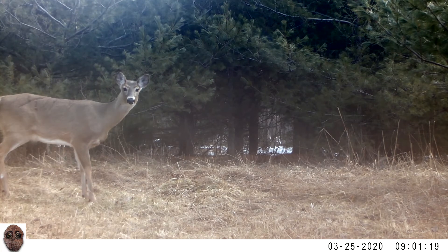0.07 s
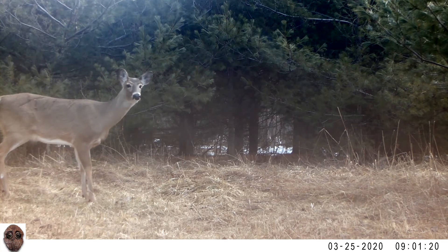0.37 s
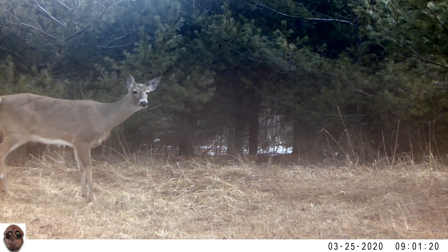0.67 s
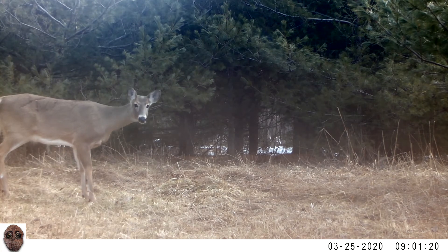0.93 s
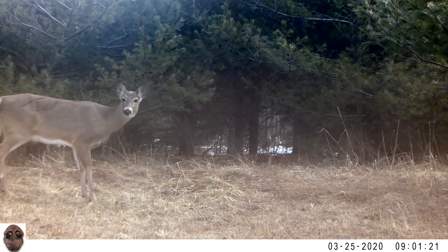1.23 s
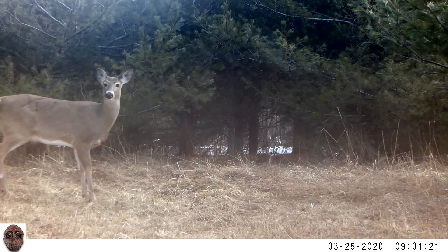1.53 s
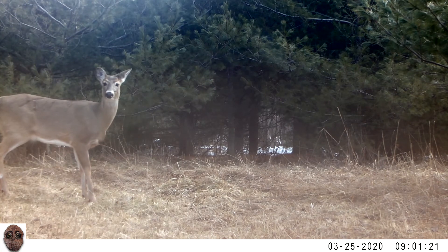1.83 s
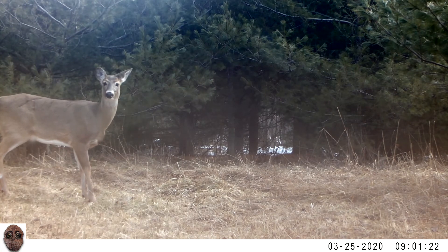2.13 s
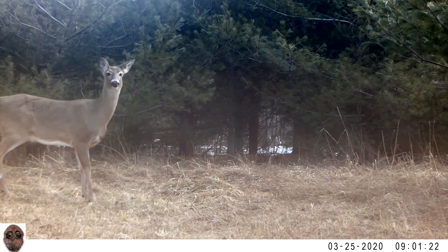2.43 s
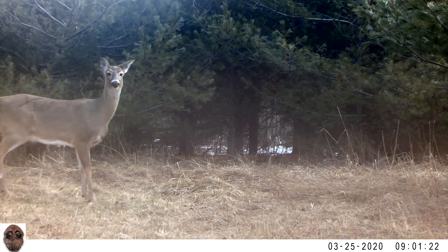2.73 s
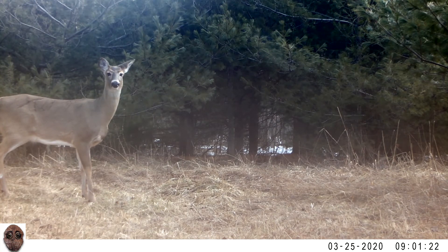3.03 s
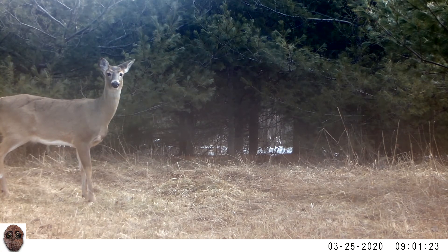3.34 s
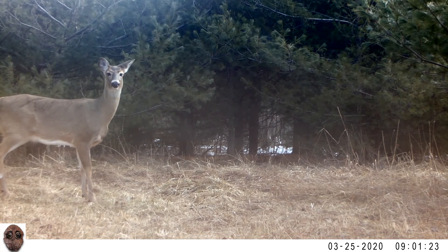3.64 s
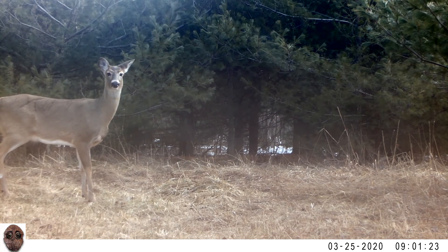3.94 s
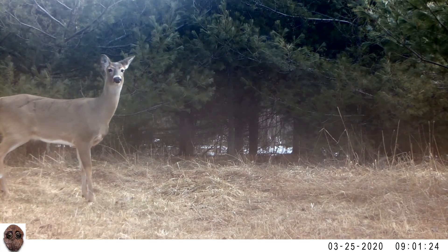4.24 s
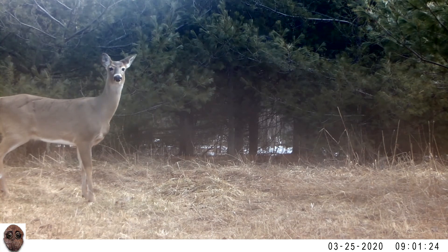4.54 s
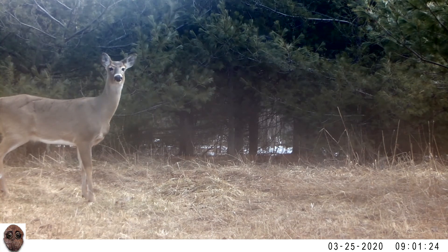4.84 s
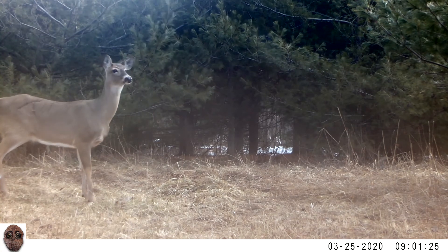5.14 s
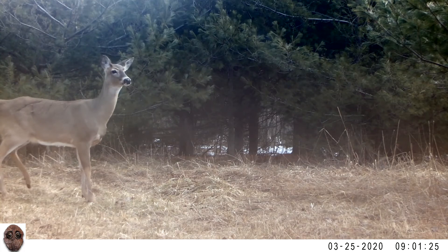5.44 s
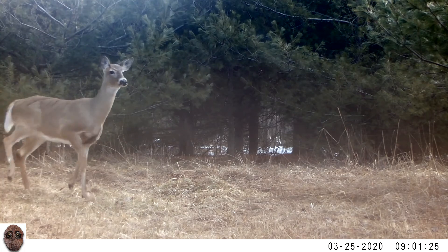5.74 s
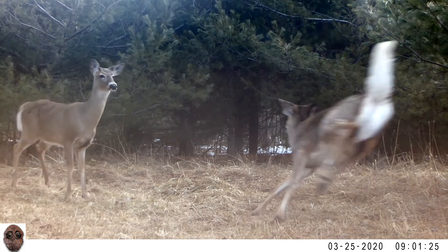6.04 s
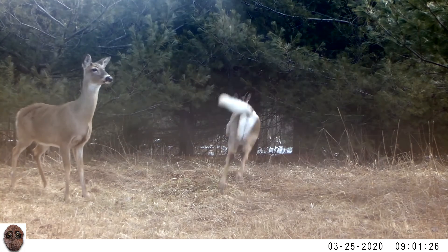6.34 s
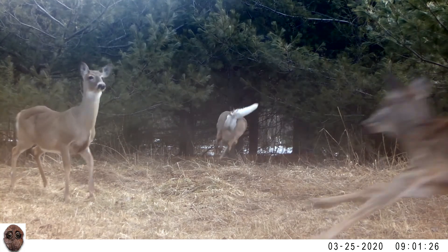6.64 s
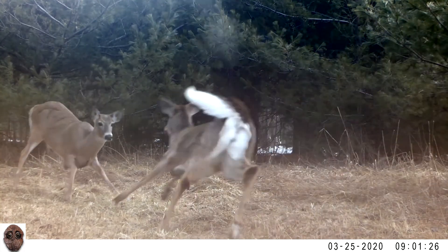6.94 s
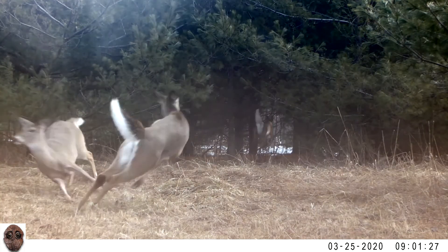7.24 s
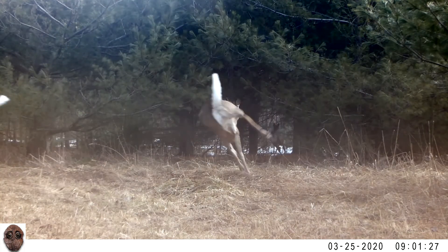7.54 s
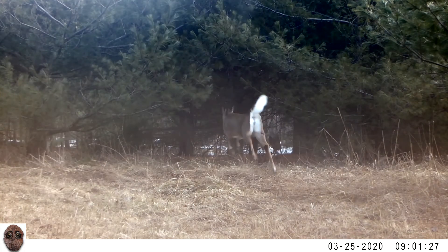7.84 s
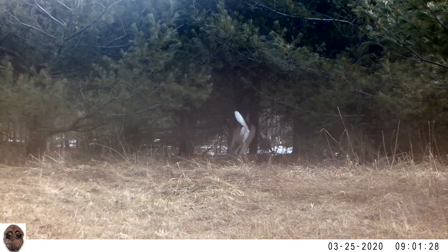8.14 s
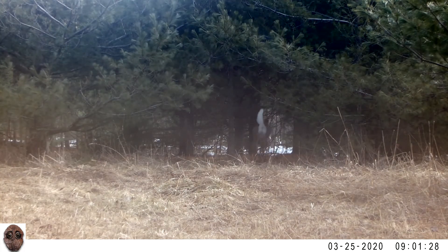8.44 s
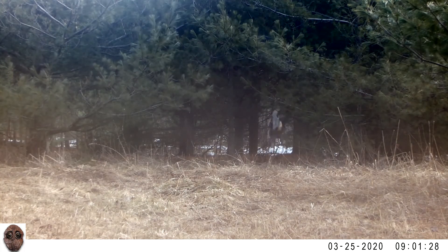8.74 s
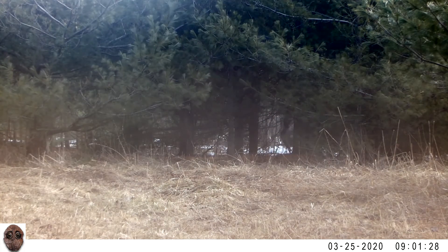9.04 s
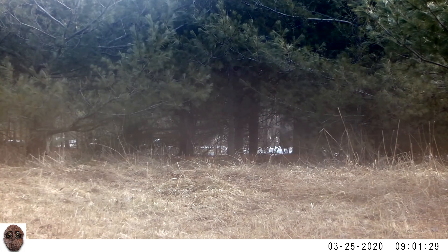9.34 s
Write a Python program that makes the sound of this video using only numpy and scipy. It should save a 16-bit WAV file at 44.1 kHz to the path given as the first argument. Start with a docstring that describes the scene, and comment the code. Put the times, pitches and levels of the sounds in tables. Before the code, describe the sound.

Distant geese call throughout over a soft hiss of air in pine trees, their voices leaving a faint echo. One gives short, high yelps several times a second, loudest in the first second. Another answers with lower, longer honks at about 0.9 seconds, then roughly once a second from 3.4 to 8.5. A third gives one broken squawk at about 2 seconds. Wind buffets the microphone in low puffs around 0.5 to 1 second and again from 3 to 4. From about 5.6 to 7.4 seconds, deer run past nearby, with brief rustles of dry grass and sharp little snaps of stalks. The loudest moment is a thump of air on the microphone just before 7 seconds, followed by a smaller one at 7.4. Afterward the yelps grow sparse and faint, with two slight rustles near 8.1 and 9.2 seconds.

```python
"""A goose yelps high and often, far off in a softly hissing pine wood. A second answers lower and longer,
and a third gives one broken squawk. Each call is a buzz shaped by the bird's throat, and the tree trunks
scatter it into a faint echo. Puffs of air buffet the microphone of a trail camera, and in the second
half deer bound past it, crushing dry grass and snapping stalks."""
import sys
import numpy as np
from scipy import signal
from scipy.fft import rfft, irfft, next_fast_len
from scipy.io import wavfile
from scipy.ndimage import map_coordinates

SR = 44100
rng = np.random.default_rng(int(sys.argv[2]) if len(sys.argv) > 2 else 0)


def wav_record(signal):
    """Record a signal, one row per channel, as 16-bit PCM in the file named by sys.argv[1]."""
    frames = np.transpose(np.atleast_2d(signal))
    bounded = np.clip(frames, -1, 1)
    # unit amplitude maps onto the largest positive 16-bit level
    quanta = np.round(bounded * 32767).astype(np.int16)
    wavfile.write(sys.argv[1], SR, quanta)


N = 414099

# The tone of dry grass breaking: frequency_hz, level_db
GRASS_TONE = [(100, -8), (450, 4.5), (1500, 4), (2200, 5.5), (4000, -5.5), (5500, -18.5), (7500, -38.5),
              (15000, -42)]
# How a goose's throat shapes a croak: frequency_hz, level_db
CROAK_THROAT = [(300, -30.5), (580, -3), (760, -6.5), (1000, 0.5), (1350, 0.5), (1750, -21.5),
                (2150, -11.5), (3000, -31.5)]


def amp(db):
    """Turn decibels into a number to multiply by."""
    return 10 ** (np.asarray(db) / 20)


def unit(x):
    """Scale a sound to an average (rms) level of 1."""
    return x / np.sqrt(np.mean(x ** 2) + 1e-20)


def along(points, hz):
    """Read between (frequency_hz, value) rows, on a scale of octaves."""
    frequencies, values = np.transpose(points)
    return np.interp(np.log(hz + 1), np.log(frequencies + 1), values)


def curve(rows):
    """Join (time_s, value) rows into one value per sample."""
    return np.interp(np.arange(N) / SR, *np.transpose(rows))


def wobble(rate, size=N):
    """A smooth curve through `rate` random values a second."""
    points = rng.standard_normal(int(size * rate / SR) + 4)
    return map_coordinates(points, [np.arange(size) * rate / SR])


def filtered(x, response):
    """Multiply each frequency in a sound by response(hz)."""
    size = next_fast_len(len(x) + 8192)
    return irfft(rfft(x, size) * response(np.fft.rfftfreq(size, 1 / SR)), size)[:len(x)]


def coloured(x, tone):
    """Shape a sound with (frequency_hz, level_db) rows."""
    return filtered(x, lambda hz: amp(along(tone, hz)))


def noise(tone, lumps=1, size=N):
    """Noise with the given tone and an average level of 1; `lumps` makes it uneven."""
    return unit(coloured(lumps * rng.standard_normal(size), tone))


def add(track, start_s, sound):
    """Mix a sound into the track."""
    start = max(round(start_s * SR), 0)
    part = track[start:start + len(sound)]
    part += sound[:len(part)]


def swell(progress, rise, fall):
    """Fade in and out as progress goes from 0 to 1; rise and fall are shares of that span."""
    fade_in = np.sin(np.pi / 2 * np.clip(progress / rise, 0, 1))
    fade_out = np.sin(np.pi / 2 * np.clip((1 - progress) / fall, 0, 1)) ** 2
    return fade_in * fade_out


def pines():
    """Air hisses softly in the pines."""
    # How loud the high part of the hiss is: time_s, level_db
    treble = [(0.0, -58), (1.99, -60), (2.12, -58.5), (5.15, -59), (5.57, -56.5), (9.39, -60)]
    # The tone of air in the trees: frequency_hz, level_db
    tone = [(20, -23.5), (80, -15), (400, -4.5), (700, 0), (1000, 0), (1500, 2.5), (1900, -2), (3000, -7),
            (4000, -14.5), (5000, -23), (6300, -32.5), (8000, -45.5), (16000, -75)]
    body_db = 5.5  # the whole hiss is this much louder than its high part
    return amp(curve(treble) + body_db + 0.74 * wobble(7.8)) * noise(tone)


def lingering_ring():
    """The blurred ring of earlier honks dies away among the trees."""
    # The tone of the ring: frequency_hz, level_db
    tone = [(500, -120), (900, -30.5), (1250, -10), (1400, 5), (1560, 3.5), (1680, -9), (1900, -32.5),
            (3000, -120)]
    start_db, fade_db_per_s = -51.5, 6.5
    return amp(start_db - fade_db_per_s * np.arange(N) / SR) * noise(tone)


def air_flow_db():
    """The level of the moving air: each gust rises, holds and dies away over a light, unsteady breeze."""
    # Gusts on the microphone: start_s, hold_s, level_db
    gusts = [(.12, 0.054, -50.5), (.37, 0.066, -62), (.525, 0.51, -42.5), (1.17, 0.098, -49),
             (1.42, 0.15, -60), (2.13, 0.11, -62), (2.47, .02, -48.5), (2.582, 0.027, -46),
             (2.791, 0.07, -45.5), (3.155, 0.81, -45), (4.02, .13, -54), (4.605, 1.04, -58.5),
             (4.857, .19, -51.5), (5.256, 0.23, -52), (6.1, 0.43, -61), (6.684, 0.937, -47),
             (6.84, 0.17, -36), (6.935, 0.028, -24.5), (7.41, 0.01, -28), (8.013, 0.18, -54),
             (8.842, 0.37, -58.5)]
    breeze_db, rise_s, fall_s = -68, 0.016, 0.024
    t = np.arange(N) / SR
    power = amp(breeze_db) ** 2
    for start_s, hold_s, level_db in gusts:
        fade = np.maximum(start_s - t, 0) / rise_s + np.maximum(t - start_s - hold_s, 0) / fall_s
        power = power + (amp(level_db) * np.exp(-np.minimum(fade, 20))) ** 2
    return 10 * np.log10(power) + 1.5 * wobble(16)


def eddy(pitch_hz):
    """A swirl of air: one swing of pressure with a random lean, plus a smaller, faster curl."""
    def swing(cycles):
        lean = np.exp(1j * rng.uniform(0, 2 * np.pi))
        return np.real(lean / (1 - 1j * cycles) ** 7)  # a pulse about one cycle long

    cycles = np.arange(-SR // 50, SR // 50) / SR * pitch_hz
    return swing(0.95 * cycles) + amp(-10.5) * swing(1.91 * cycles - 0.6)


def wind():
    """Air buffets the microphone in lumps over a deep rumble, with single sharp swirls on top."""
    # The tone of the buffeting: frequency_hz, level_db
    buffet_tone = [(10, -33.5), (40, -18), (80, -1.5), (135, 2), (230, -5), (350, -12), (550, -27.5),
                   (900, -43), (2000, -94.5)]
    # The tone of the rumble: frequency_hz, level_db
    rumble_tone = [(10, -9), (35, 2), (70, 4), (140, -14), (400, -63.5)]
    # The tone of tiny, fluttering swirls: frequency_hz, level_db
    flutter_tone = [(20, -40), (100, -24), (300, -2.5), (520, 0.5), (900, -14.5), (1300, -22.5),
                    (2200, -58), (5000, -120)]
    # The strongest swirls: middle_s, level_db, pitch_hz
    eddies = [(0.5332, -31, 217), (0.614, -23, 272), (0.6467, -30.5, 237), (.771, -27, 325),
              (1.0135, -28.5, 228), (3.1588, -19.5, 235), (3.1847, -23, 408), (3.5254, -26.5, 210),
              (3.563, -28, 423), (3.651, -27.5, 256), (3.7091, -27, 260), (3.7234, -23, 298),
              (3.819, -25, 227), (6.715, -24, 238), (6.86, -20.5, 272), (6.9149, -11, 580),
              (6.933, -3, 406), (6.94, -12.5, 395), (6.9526, -14, 377), (7.0013, -10.5, 468),
              (7.378, -20, 180), (7.4049, -20.5, 340), (7.425, -15.5, 355)]
    flow_db = air_flow_db()
    lumps = amp(4.5 * wobble(70))
    out = amp(flow_db) * noise(buffet_tone, lumps)
    # The rumble grows more slowly and the flutter faster, so strong gusts are brighter.
    out += amp(0.58 * flow_db - 28) * noise(rumble_tone)
    out += amp(1.318 * flow_db + 1) * noise(flutter_tone, lumps)
    for middle_s, level_db, pitch_hz in eddies:
        swirl = eddy(pitch_hz)
        add(out, middle_s - len(swirl) / 2 / SR, amp(level_db) * swirl)
    return out


def deer_steps():
    """Each step of a deer crushes a cluster of dry grass blades."""
    # Legs brushing through grass: start_s, brush_s, level_db
    steps = [(5.648, 0.038, -47), (5.712, 0.064, -48.5), (5.818, 0.036, -39), (5.8633, 0.041, -43),
             (6.279, 0.041, -47.5), (6.335, 0.053, -48), (6.478, 0.029, -45), (6.508, 0.061, -46.5),
             (6.715, 0.03, -46.5), (6.765, 0.05, -46.5), (6.858, 0.027, -50), (7.027, 0.036, -61),
             (7.219, 0.063, -51.5), (7.349, 0.043, -51), (8.134, 0.055, -56.5), (9.212, 0.099, -55.5)]
    out = np.zeros(N)
    for start_s, brush_s, level_db in steps:
        size = int(1.34 * brush_s * SR)  # the crackle outlasts the brush
        crackle = noise(GRASS_TONE, lumps=amp(5.3 * wobble(1205, size)), size=size)
        fade = swell(np.linspace(0, 1, size), rise=0.11, fall=0.68)
        add(out, start_s, amp(level_db) * crackle * fade)
    return out


def snapping_stalks():
    """Dry stalks snap under the deer; thin ones sound brighter than twigs."""
    # Snaps: start_s, peak_db, brightness_db_per_octave
    snaps = [(5.8675, -31, -4), (6.216, -39, 4), (6.362, -26.5, -1.5), (6.521, -30, -3), (6.62, -32, 3),
             (6.7254, -33, 6), (7.0066, -30.5, 5.5), (7.043, -36, 4.5), (7.147, -39, 4.5),
             (7.229, -33.5, 1.5)]
    fade_s, lead_samples = 0.008, SR // 700
    t = np.arange(SR // 50) / SR
    out = np.zeros(N)
    for start_s, peak_db, brightness in snaps:
        burst = np.pad(rng.standard_normal(len(t)) * amp(-60 * t / fade_s), (lead_samples, 0))
        tone = lambda hz: amp(along(GRASS_TONE, hz) + brightness * np.log2(np.maximum(hz, 100)))
        crack = filtered(burst, tone)
        add(out, start_s - lead_samples / SR, amp(peak_db) * crack / np.abs(crack).max())
    return out


def wood_echo(calls):
    """Many trunks scatter the calls into a long, thin tail in which their pitch is blurred."""
    # The tone of the echo: frequency_hz, level_db
    tone = [(300, -19.5), (750, -7.5), (1500, -2), (2500, 0), (6000, -7)]
    # How long the echo takes to fade by 60 dB: frequency_hz, fade_s
    fade_times = [(300, .8), (1500, 2.6), (5000, 0.89)]
    hz, t, bands = signal.stft(rng.standard_normal(int(1.5 * SR)), SR, nperseg=256)
    fade = amp(-60 * t / along(fade_times, hz)[:, None])
    tail = signal.istft(bands * fade, SR, nperseg=256)[1]
    blurred = calls * wobble(190)
    scattered = signal.fftconvolve(blurred, tail / np.linalg.norm(tail))[:N]
    return coloured(scattered, tone)


def tree_line(calls, nearest_s, farthest_s, level_db, count):
    """Trunks at the near edge of the wood send back a few soft copies, the later ones weaker."""
    out = np.zeros(N)
    for delay_s in np.linspace(nearest_s, farthest_s, count) + rng.uniform(0, 0.004, count):
        add(out, delay_s, amp(level_db) * np.sqrt(nearest_s / delay_s) * calls)
    return out


def harmonics(pitch_hz, level_db, count, flutter_db):
    """A voice: tones at k = 1, 2, 3... times the pitch. Paths through the trees make each one flutter."""
    phase = 2 * np.pi * np.cumsum(pitch_hz) / SR
    out = np.zeros(len(phase))
    for k in range(1, count + 1):
        gain = amp(level_db(k) + flutter_db * wobble(71.5, len(phase)))
        out += gain * np.sin(k * phase + rng.uniform(0, 2 * np.pi))
    return out


def grunt(length_s, start_hz, end_hz, throat, jitter, growth_db):
    """A goose's low voice: a slow, sliding buzz shaped by the throat, growing until the voice breaks."""
    progress = np.linspace(0, 1, int(length_s * SR))
    slide_hz = start_hz * (end_hz / start_hz) ** progress
    pitch_hz = slide_hz * (1 + jitter * wobble(250, len(progress)))
    buzz = harmonics(pitch_hz, lambda k: along(throat, k * pitch_hz), count=16, flutter_db=4)
    return unit(buzz) * amp(growth_db * (progress - 1.5)) * swell(progress, rise=0.52, fall=0.18)


def honk(arch_s, top_hz, base_db, octave_db, throat, upper_db,
         crest, droop, flatness, rise, fall, rasp, flutter_db):
    """A goose's high voice: it scoops into an arch of pitch, ragged at the break and then cleaner."""
    # The arch runs from 0 to 1 and peaks at `crest`; the sound spills past both ends.
    place = np.arange(-0.06, 1.2, 1 / (arch_s * SR))
    size = len(place)
    progress = np.linspace(0, 1, size)
    scoop = 0.03 * np.exp(-progress / 0.075)
    bend = 1 - droop * np.abs(place - crest) ** flatness - scoop
    pitch_hz = top_hz * bend * (1 + 0.0088 * wobble(166, size) + 0.003 * wobble(30, size))
    # The throat rings an octave above the base tone; that octave fades as the pitch sinks away.
    ring_db = octave_db + 1.1 - 34 * (1 - bend)
    effort_db = (base_db + ring_db) / 2 + upper_db
    level_db = lambda k: base_db if k == 1 else ring_db if k == 2 else effort_db + along(throat, k * pitch_hz)
    tone = harmonics(pitch_hz, level_db, count=10, flutter_db=flutter_db)
    ragged = 1 + (0.064 + rasp * np.exp(-progress / 0.083)) * wobble(650, size)
    return np.sqrt(2) * tone * ragged * swell(progress, rise, fall)


def squawking_goose():
    """A small cluck, then a shrill rising note that breaks down to a lower, duller one."""
    # The three notes: start_s, arch_s, top_hz, crest (share of the arch), base_db, octave_db, shrill_db
    notes = [(1.975, 0.061, 521, 0.56, -57.5, -59, 1), (2.098, .098, 628.3, 0.84, -47, -40.5, -3),
             (2.158, 0.15, 513.7, 0.393, -45.5, -43.5, -25)]
    # The strength of this voice's upper tones: frequency_hz, level_db
    throat = [(1500, 9), (1900, -9), (2500, -17), (3050, -15), (3800, -29), (4900, -23), (5500, -29),
              (6200, -44)]
    out = np.zeros(N)
    for start_s, arch_s, top_hz, crest, base_db, octave_db, shrill_db in notes:
        note = honk(arch_s, top_hz, base_db, octave_db, throat, upper_db=shrill_db, crest=crest,
                    droop=0.27, flatness=2.25, rise=0.33, fall=0.48, rasp=0.25, flutter_db=-1.5)
        add(out, start_s, note)
    # A hoarse undertone runs through the break between the last two notes.
    add(out, 2.06, amp(-43.5) * grunt(0.27, 280, 262, CROAK_THROAT, jitter=0.04, growth_db=1.5))
    return out


def low_goose():
    """Long, flat honks, each led in by a soft rising murmur and a hoarse croak."""
    # The honks: start_s, arch_s, top_hz, base_db, octave_db
    honks = [(0.881, 0.12, 685.6, -46, -36.5), (3.356, 0.13, 652.5, -43, -47.5),
             (4.409, 0.15, 657.6, -47, -41.5), (5.427, .17, 675, -48, -44), (6.515, .135, 657, -49, -48),
             (7.53, .15, 668, -49.5, -41), (8.536, 0.14, 666, -53, -39.5)]
    # The strength of this voice's upper tones: frequency_hz, level_db
    throat = [(1500, -28.5), (2050, -18), (2700, -28.5), (4000, -35), (6000, -58)]
    # How the throat shapes the murmur: frequency_hz, level_db
    murmur_throat = [(400, -23), (720, -8.5), (930, 4.5), (1200, -11), (1500, -26.5), (2000, -31.5)]
    out = np.zeros(N)
    for start_s, arch_s, top_hz, base_db, octave_db in honks:
        murmur = grunt(0.22, 112, 131, murmur_throat, jitter=0.004, growth_db=11.5)
        croak = grunt(0.07, 150, 220, CROAK_THROAT, jitter=0.06, growth_db=1)
        call = honk(arch_s, top_hz, base_db, octave_db, throat, upper_db=3, crest=0.4485,
                    droop=0.548, flatness=3.57, rise=0.1, fall=0.53, rasp=0.5, flutter_db=0.2)
        mean_db = (base_db + octave_db) / 2
        add(out, start_s - 0.2, amp(mean_db + 2) * murmur)
        add(out, start_s - 0.026, amp(mean_db + 0.5) * croak)
        add(out, start_s, call)
    return out


def high_goose():
    """Short yelps that fall away, each opened by a brief croak; louder ones are brighter."""
    # The yelps: start_s, arch_s, top_hz, octave_db
    yelps = [(0.115, 0.066, 761.4, -39), (0.293, 0.088, 765, -39), (0.481, 0.058, 761, -35.5),
             (.921, 0.085, 773, -35.5), (1.253, 0.067, 763, -43.5), (1.459, 0.098, 758, -44),
             (2.188, .105, 781, -45.5), (3.379, .11, 745, -47.5), (3.579, .086, 728, -47.5),
             (3.749, 0.075, 717, -53.5), (4.06, 0.13, 750.5, -49.5), (4.468, 0.089, 758, -52),
             (4.648, 0.1, 732, -51.5), (4.828, 0.087, 761, -47.5), (5.035, 0.084, 751, -47),
             (5.26, 0.06, 762, -50.5), (5.521, 0.15, 760, -47.5), (5.926, 0.065, 762, -52.5),
             (6.221, 0.13, 752, -54), (6.664, 0.087, 770, -52), (6.83, 0.08, 742, -50.5),
             (7.091, 0.069, 768, -52.5), (7.346, 0.073, 715, -57), (7.784, 0.15, 750, -64),
             (8.733, 0.062, 770, -60), (8.925, 0.091, 754, -66), (9.223, 0.055, 736, -76)]
    # The strength of this voice's upper tones: frequency_hz, level_db
    throat = [(1500, -5.5), (2000, -19.5), (2300, -13), (2700, -16), (3100, -25), (3400, -23.5),
              (3850, -20), (4300, -30), (4700, -31), (6000, -50.5), (8000, -63.5)]
    even_db = -52.5  # at this level the base tone and its octave are about equally loud
    out = np.zeros(N)
    for start_s, arch_s, top_hz, octave_db in yelps:
        base_db = even_db + 0.47 * (octave_db - even_db)
        croak = grunt(0.064, 140, 250, CROAK_THROAT, jitter=0.047, growth_db=14.5)
        yelp = honk(arch_s, top_hz, base_db, octave_db, throat, upper_db=-0.5, crest=0.33,
                    droop=0.351, flatness=2.05, rise=0.1, fall=0.49, rasp=0.8, flutter_db=2)
        add(out, start_s - 0.045, amp(base_db + 13) * croak)
        add(out, start_s, yelp)
    return out


def scene():
    """Far geese and their echoes, near deer, and the air."""
    geese = high_goose() + low_goose() + squawking_goose()
    echoes = tree_line(geese, nearest_s=0.016, farthest_s=0.06, level_db=-18, count=3)
    echoes += amp(-10) * wood_echo(geese)
    deer = deer_steps() + snapping_stalks()
    return (geese + echoes + deer + wind() + pines() + lingering_ring())[None]


def record(dry):
    """The camera adds its own hiss and a thin whine, and cuts off the very highest sounds."""
    # The tone of the camera's hiss: frequency_hz, level_db
    hiss_tone = [(20, 2), (5000, -3), (8000, -3.5), (11000, -1), (16000, -0.5)]
    whine_hz, cutoff_hz = (7767, 7826), 15750
    hiss = amp(-80) * noise(hiss_tone)
    whine = amp(-102.5) * sum(np.sin(2 * np.pi * hz * np.arange(N) / SR) for hz in whine_hz)
    return filtered(dry[0] + hiss + whine, lambda hz: hz < cutoff_hz)[None]


dry = scene()
out = record(dry)
wav_record(out)
```